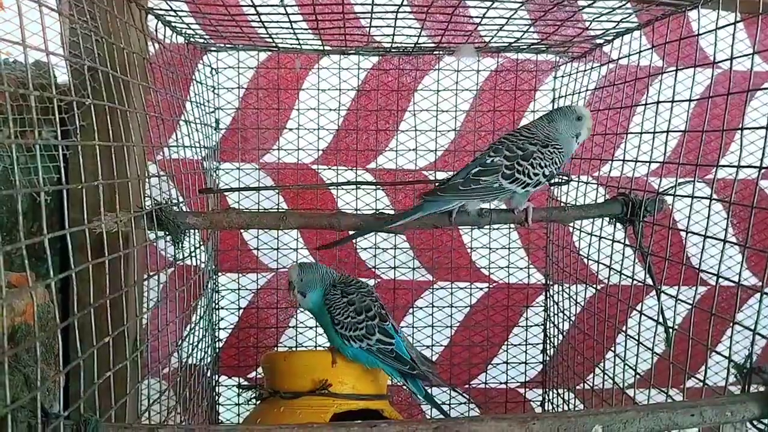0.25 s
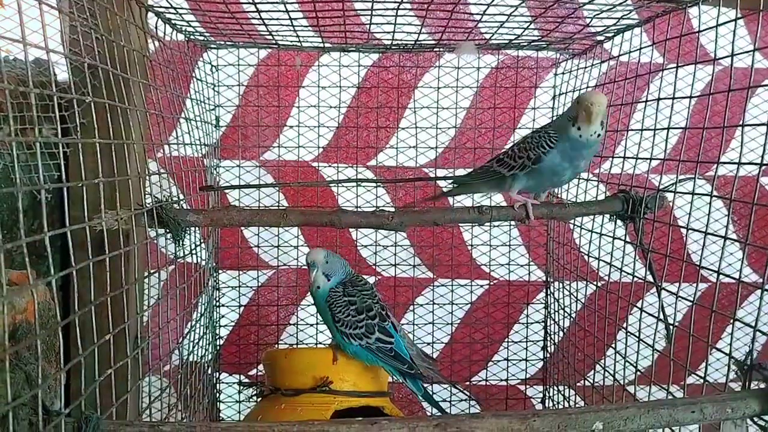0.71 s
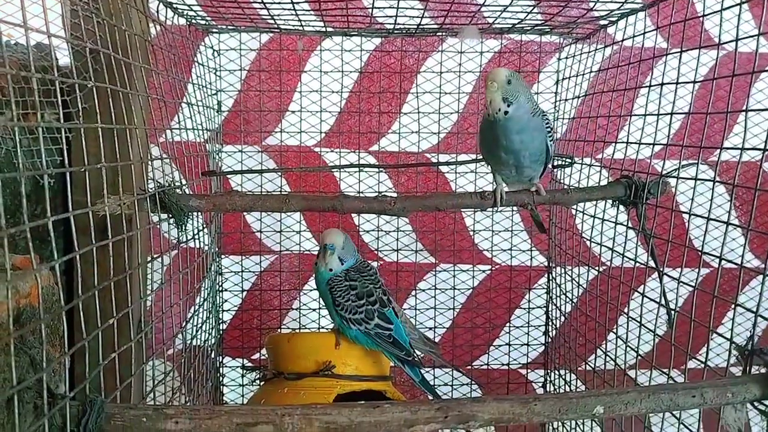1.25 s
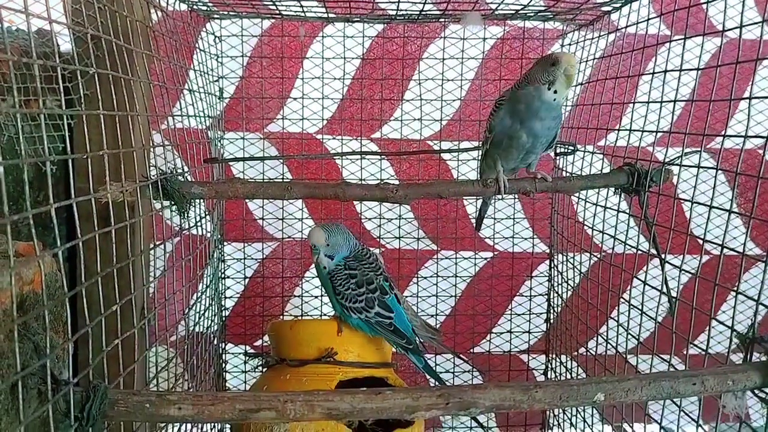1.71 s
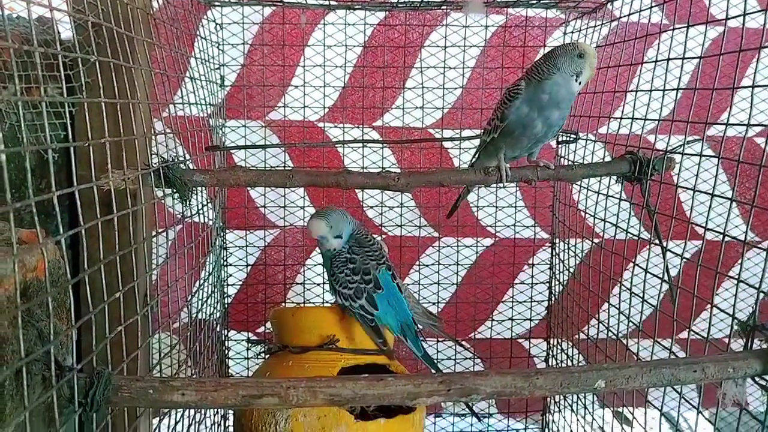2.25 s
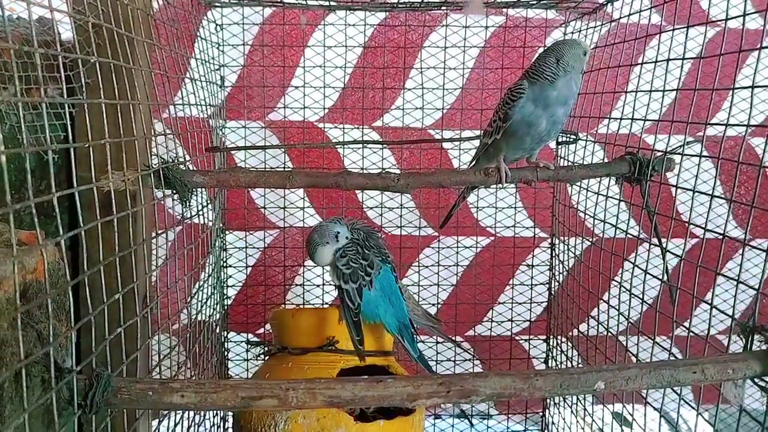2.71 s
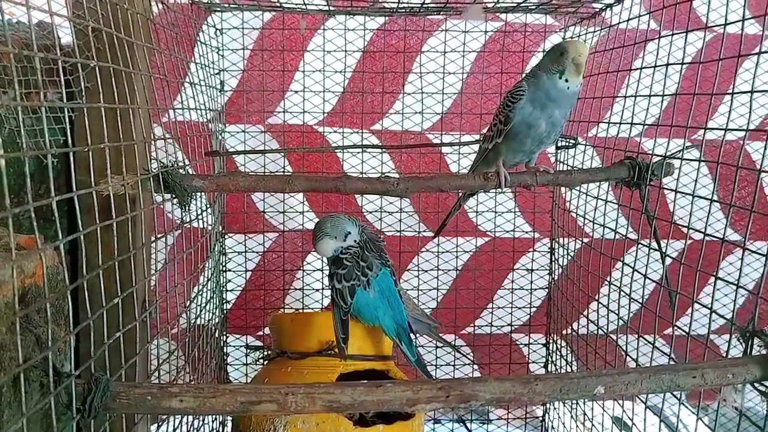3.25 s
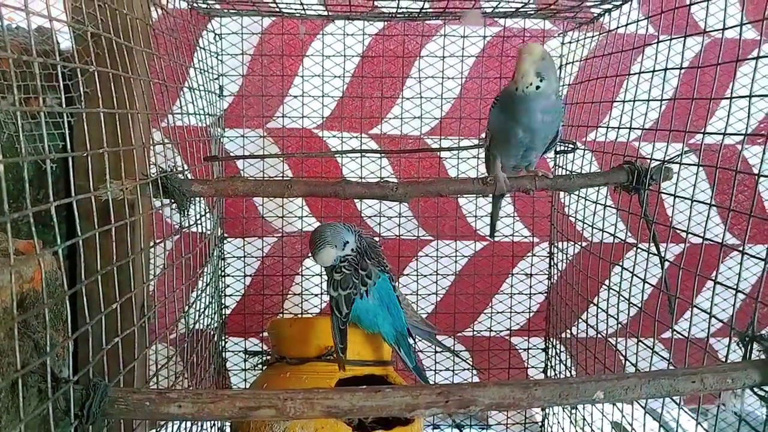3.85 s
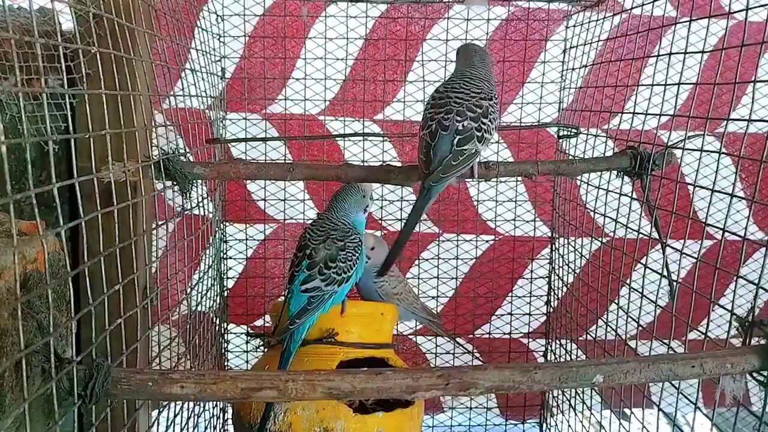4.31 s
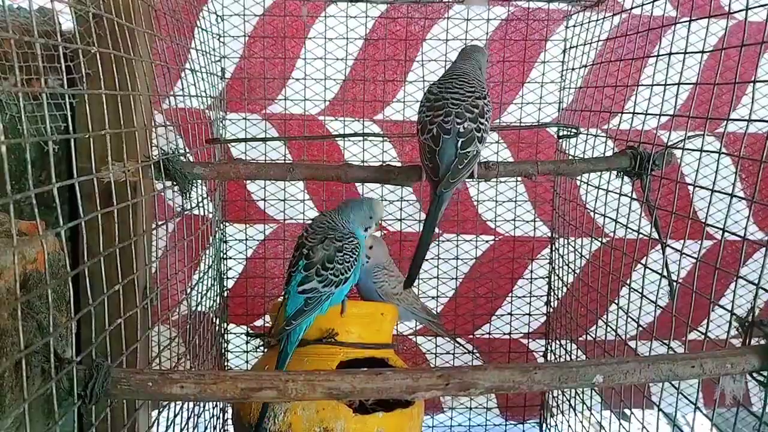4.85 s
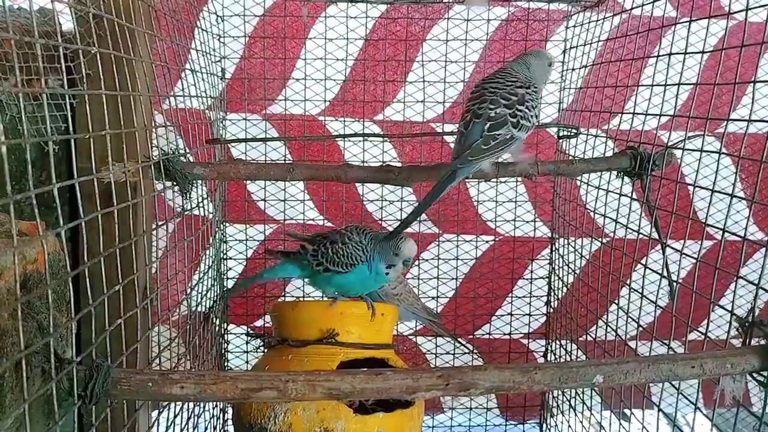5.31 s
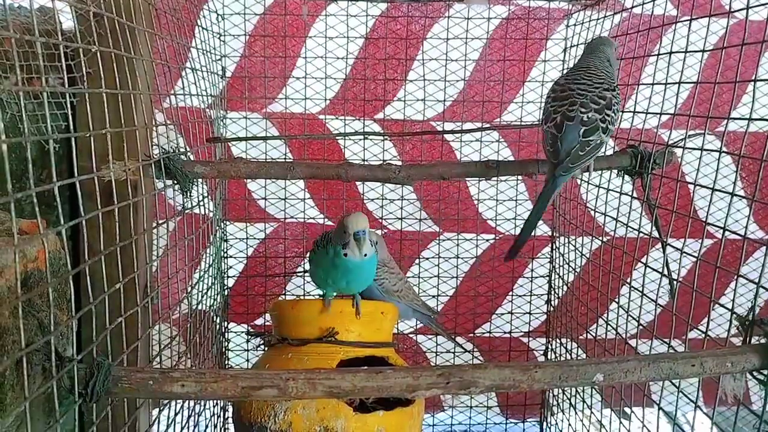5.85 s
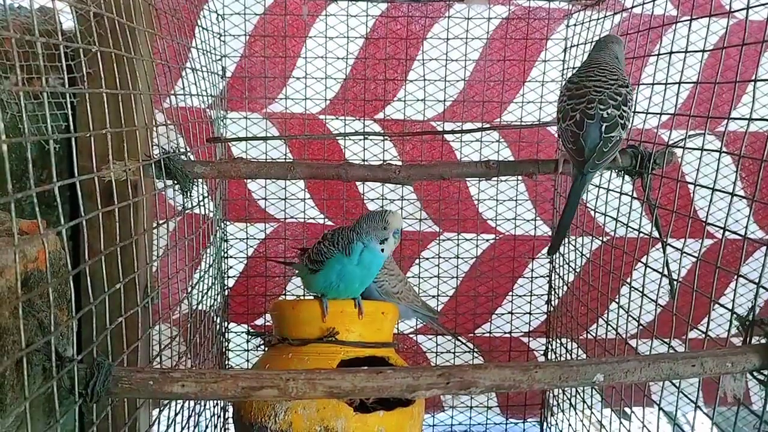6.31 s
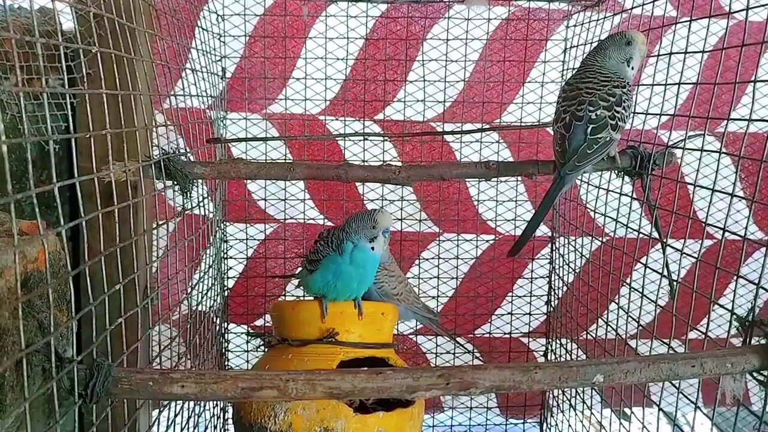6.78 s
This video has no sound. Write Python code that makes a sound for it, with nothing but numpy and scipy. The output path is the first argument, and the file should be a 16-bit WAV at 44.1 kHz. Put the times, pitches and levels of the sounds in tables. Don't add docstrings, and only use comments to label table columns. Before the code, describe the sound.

Budgies give sharp, sliding chirps and reedy chatter in an echoing cage, with soft throaty warbles, faint claw scrapes and a quiet outdoor hum behind.

```python
import sys
import numpy as np
from scipy import signal
from scipy.fft import rfft, irfft, next_fast_len
from scipy.io import wavfile
from scipy.ndimage import map_coordinates

SR = 44100
rng = np.random.default_rng(int(sys.argv[2]) if len(sys.argv) > 2 else 0)


def decibels_to_gain(level_db):
    exponent = np.asarray(level_db, float) / 20
    return 10 ** exponent


def inscribe(sig):
    pcm = np.round(np.clip(np.atleast_2d(sig).T, -1, 1) * 32767)
    wavfile.write(sys.argv[1], SR, pcm.astype(np.int16))


N = 311346

# pitch_hz, density_db [per Hz]
TRAFFIC_SPECTRUM = [(12, -32), (20, -18.5), (49, -0.5), (80, -2), (245, -6.5), (304, -12.5), (500, -21),
                    (650, -32.5), (1100, -120)]
# pitch_hz, density_db [per Hz]
AIR_SPECTRUM = [(240, -15), (400, -7.5), (715, -3), (1170, -6.5), (1510, -7.5), (2970, -2.5), (3510, -2),
                (4290, -12), (8400, -15), (10100, -26.5), (11200, -22.5), (13300, -61), (15400, -49),
                (15900, -130)]
# start_s, level_db
MOTOR_LEVEL = [
    (3.4, -81),
    (3.6, -58.5),
    (7.1, -60),
]
# pitch_hz, gain_db
MICROPHONE = [(9000, -1.5), (9600, -3.5), (10200, -30), (10750, -6), (11500, -0.5), (12500, -22.5),
              (13500, -41), (14600, -22), (15400, -27), (15900, -70)]
# pitch_hz, t60_s
SHELTER_DECAY = [(1000, 0.52), (3000, 0.55), (6000, 0.48), (12000, 0.3)]

SOFT_PARTIALS = [0, -11.5, -18, -19, -21.5]
PRESSED_PARTIALS = [-11, -1.5, -11, -9.5, -22.5]
THROATY_PARTIALS = [6.5, -14.5, -28.5, -19.5]

# start_s, overtones_db
FACING_MICROPHONE = [(.03, -25.5), (.12, -25), (1.25, -15), (1.33, -31), (1.63, -19.5), (1.9, -14),
                     (2.36, -19), (2.5, -30), (2.7, -22.5), (3.1, -25.5), (3.6, -28), (3.9, -18),
                     (4.75, -23), (4.89, -31.5), (5.0, -26), (5.2, -32), (6.85, -25.5), (7.0, -26.5)]
# start_s, from_hz, to_hz, level_db
FAST_GLIDES = [(.031, 2596, 3170, -21.5), (.045, 3210, 3600, -21), (.056, 3320, 2750, -35),
               (.076, 3490, 2760, -31), (.064, 2333, 1780, -32.5), (.095, 1870, 2380, -33.5),
               (.122, 2793, 2310, -25.5), (1.29, 3580, 3050, -29), (1.316, 4350, 3500, -27),
               (2.52, 2410, 2880, -35.5), (2.545, 1930, 1313, -39.5), (2.867, 1596, 2240, -42),
               (3.051, 4130, 3670, -42.5), (3.103, 3680, 4300, -37), (3.159, 1735, 2120, -39.5),
               (3.634, 2820, 3130, -35), (3.686, 1618, 1850, -31), (4.859, 2166, 1690, -37.5),
               (5.13, 4090, 3480, -41), (5.174, 3000, 2590, -26), (5.546, 1177, 935, -49),
               (6.986, 1980, 1770, -32), (6.99, 1310, 1770, -42.5)]
MIDDLING_GLIDES = [(.084, 4400, 4930, -34), (.132, 5340, 4860, -42), (1.87, 1660, 2280, -48),
                   (1.874, 1723, 1520, -37.5), (2.66, 4100, 3940, -31), (3.572, 2573, 3250, -25.5),
                   (3.933, 3950, 3430, -31.5), (4.743, 3620, 4020, -45.5), (4.875, 3170, 2570, -31),
                   (4.895, 2994, 2600, -26.5), (5.007, 2006, 2510, -32), (6.875, 4260, 3470, -34.5)]
SLOW_GLIDES = [(1.255, 3380, 4120, -39), (1.263, 2260, 2600, -31.5), (1.295, 3047, 2660, -28),
               (1.69, 2670, 2375, -33), (1.866, 3430, 2900, -36.5), (2.157, 3030, 2900, -36),
               (2.36, 1658, 2210, -43.5), (2.392, 2910, 2480, -39.5), (2.432, 2700, 2900, -45),
               (2.44, 2837, 3420, -36), (2.712, 2700, 2900, -26.5), (2.682, 2128, 2420, -30.5),
               (3.071, 2813, 3730, -38), (3.139, 2680, 2260, -36), (4.915, 3134, 2280, -30.5),
               (5.17, 3260, 3400, -36.5), (5.185, 2978, 2700, -22), (5.198, 3270, 2860, -29.5),
               (6.815, 2910, 2500, -37.5)]
# start_s, length_s, pitch_hz, level_db
HELD_NOTES = [(0, 0.034, 1647, -50), (0, 0.0087, 3230, -39), (1.269, 0.017, 2670, -37),
              (1.594, 0.017, 3470, -36.5), (1.622, 0.0072, 1650, -35), (1.951, 0.035, 3560, -39),
              (2.405, 0.019, 2165, -36), (2.466, 0.036, 3410, -46), (3.035, 0.018, 2120, -55),
              (3.04, 0.0087, 2003, -36), (3.474, 0.036, 1783, -37.5), (3.529, 0.0067, 2700, -26.5),
              (4.794, 0.026, 1324, -44.5), (5.017, 0.022, 1407, -48.5), (5.129, 0.077, 3724, -47),
              (5.193, 0.0065, 2420, -34), (5.28, 0.014, 2476, -24.5), (7.038, .058, 2550, -45)]
# start_s, length_s, pitch_hz, level_db
BEAK_PARTIALS = [
    (2.7, .06, 15000, -62),
    (2.76, .1, 12900, -52),
    (2.82, .06, 15000, -56),
    (3.6, .07, 15000, -58),
    (3.6, .07, 12900, -52),
    (4.955, .07, 15100, -52),
    (4.96, 0.051, 12600, -60),
    (5.22, .05, 15000, -65),
    (6.944, .07, 15100, -58),
]
# start_s, length_s, pitch_hz, level_db, overtones_db
LOUD_NOTES = [(.049, 0.068, 3540, -24.5, -18), (1.34, 0.0076, 3106, -17, -14),
              (1.369, 0.024, 2707, -27, 6.5), (1.932, 0.013, 3493, -22, -25),
              (1.965, 0.051, 2900, -21, -11), (2.761, .105, 3203, -24, -30), (3.6, 0.042, 3253, -25.5, -22),
              (3.909, 0.0082, 2697, -27.5, -5.5), (4.89, 0.023, 2873, -20, -43),
              (4.93, 0.0073, 3143, -19.5, -30), (4.957, 0.036, 2510, -26, -23.5),
              (5.214, .016, 2840, -19, -29)]
# start_s, length_s, from_hz, to_hz, level_db
REEDY_GLIDES = [(0.114, 0.027, 2940, 2495, -23), (1.619, 0.017, 2214, 1680, -38.5),
                (1.91, 0.015, 2140, 2830, -31), (1.936, 0.013, 2740, 2900, -24),
                (2.414, 0.028, 3190, 2870, -40), (2.695, 0.023, 3353, 2644, -22),
                (2.732, 0.03, 2570, 3216, -18), (2.8, 0.049, 2900, 2438, -27.5),
                (3.117, 0.02, 2740, 2480, -36.5), (3.504, 0.072, 2265, 2003, -40),
                (3.636, .025, 2878, 2586, -18), (3.942, 0.016, 2165, 1650, -41),
                (6.829, 0.017, 2343, 2056, -28.5), (6.854, 0.018, 3077, 2458, -19.5),
                (6.889, 0.021, 2378, 3100, -22), (7.002, 0.052, 2410, 2900, -33.5)]
# start_s, length_s, pitch_hz, level_db, overtones_db
REEDY_NOTES = [(1.248, 0.033, 3150, -35, -11), (1.307, 0.013, 2075, -31.5, -26),
               (1.646, 0.021, 2690, -30, -9), (1.658, 0.019, 2880, -27.5, -9.5),
               (1.672, 0.046, 2743, -21.5, -16), (1.898, 0.0057, 2685, -24.5, -18),
               (2.144, 0.03, 2080, -49.5, -3), (2.867, 0.015, 1470, -39, -14),
               (3.557, 0.019, 2280, -35.5, -21), (3.826, 0.029, 1982, -38, -15.5),
               (3.976, 0.015, 2350, -38, -10), (5.022, 0.012, 1170, -41, -7),
               (5.133, 0.023, 1973, -39, -22), (5.161, 0.017, 1870, -34.5, -24),
               (6.908, 0.033, 3078, -21, -27.5), (6.959, 0.028, 2493, -30.5, -19),
               (6.455, 0.026, 1590, -41, 1.5)]
# start_s, pitch_hz, level_db, overtones_db
REEDY_CLIMB = [
    (1.945, 2782, -26, -6.5),
    (1.965, 2840, -24.5, -5),
    (1.99, 2964, -24.5, -3),
    (2.012, 2936, -27, -7),
]

# start_s, length_s, level_db, centre_hz
RASPED_CALLS = [(1.14, 0.082, -51, 2540), (2.82, .07, -64, 9200), (0.021, 0.023, -49, 3600),
                (5.19, 0.014, -56.5, 4700), (0.068, 0.054, -33.5, 2890), (0.55, 0.19, -63.5, 5070),
                (1.1, 0.024, -65, 8200), (.908, 0.011, -65, 5500), (0.76, 0.036, -58, 2400),
                (1.16, 0.033, -65.5, 7900), (1, 0.013, -54.5, 3030), (.925, .012, -45, 6900),
                (2.659, 0.09, -39, 3120), (4.269, 0.035, -52.5, 3300), (4.326, 0.64, -55, 2260),
                (4.353, 0.36, -59.5, 3300), (5.594, 0.23, -67, 8040), (6.463, 0.34, -51.5, 2170),
                (6.81, 0.018, -41, 3130)]
# start_s, length_s, level_db, centre_hz
FEATHER_RUSTLES = [(0, 0.021, -59, 4900), (.059, 0.049, -54, 6050), (1.093, .11, -56, 1990),
                   (1.244, 0.018, -57.5, 7750), (1.285, 0.14, -46, 7100), (2.14, 0.18, -61, 5200),
                   (2.32, 0.078, -58.5, 4030), (3.2, 0.24, -69.5, 10500), (3.92, 0.054, -49.5, 4600),
                   (4.232, .15, -59.5, 5350), (4.645, 0.17, -57.5, 5300), (5.68, 0.029, -68.5, 3980),
                   (6.206, 0.45, -64.5, 7100), (6.805, 0.14, -56, 5760)]
# start_s, length_s, level_db, centre_hz
CLAW_SCRAPES = [(.778, 0.018, -60, 4950), (.793, 0.026, -53.5, 2780), (.888, 0.021, -52, 4450),
                (.904, 0.031, -39.5, 4150), (2.656, 0.027, -57, 3130), (4.19, 0.017, -62.5, 9150),
                (5.86, 0.083, -59, 2250), (6.05, 0.055, -56, 3350), (6.093, 0.16, -54, 1980),
                (6.384, 0.022, -52.5, 1570), (6.743, 0.052, -54, 2030)]

# start_s, length_s, from_hz, to_hz, level_db
CLOSE_GLIDES = [(0.017, 0.0081, 2750, 4340, -36.5), (1.24, 0.013, 4440, 3520, -31.5),
                (1.242, 0.021, 2240, 1690, -34), (1.286, 0.018, 3804, 3037, -21.5),
                (2.338, .024, 1950, 1610, -33.5), (2.656, .009, 1490, 4280, -31),
                (3.849, 0.013, 4440, 3370, -43.5), (3.901, 0.0073, 4500, 3900, -35.5),
                (4.863, 0.01, 4250, 3500, -36), (5.18, .016, 3254, 2750, -24),
                (5.284, 0.011, 4040, 3470, -33), (6.813, 0.0138, 4165, 3323, -30.5)]
# start_s, pitch_hz, level_db, overtones_db
CLOSE_BENDS = [
    [(3.862, 2744, -47, -6), (3.872, 3150, -39, -1), (3.88, 3450, -39, 3), (3.9, 3310, -33, 1)],
    [(5.264, 2555, -28, -14), (5.275, 2440, -31.5, -8.5), (5.29, 2370, -31, -9)],
]

# start_s, from_hz, to_hz, level_db
NEAR_MURMURS = [(4.28, 1080, 1257, -47), (4.328, 1240, 1174, -50), (4.37, 992, 1034, -45.5),
                (4.409, 1175, 1210, -46), (4.44, 1004, 1093, -48), (4.481, 1280, 1317, -41),
                (4.524, 1133, 1070, -41.5), (4.565, 1081, 1049, -47), (4.601, 1198, 1350, -47.5),
                (4.661, 1185, 1153, -44.5), (6.113, 1014, 1040, -59), (6.166, 1122, 1155, -53.5),
                (6.238, 1114, 1070, -64)]
# start_s, pitch_hz, level_db, overtones_db
NEAR_WARBLES = [
    [(4.728, 1396, -44.5, 6.5), (4.765, 1362, -46, 4.5), (4.782, 1547, -44, 3.5), (4.79, 1670, -38, -14),
     (4.8, 2420, -39, -27)],
    [(6.22, 1330, -58, 5), (6.255, 1452, -49, -7), (6.29, 1425, -48, 2), (6.318, 1528, -47.5, 2),
     (6.33, 1682, -37, -1.5), (6.352, 1894, -32, -20), (6.4, 2000, -32.5, -14), (6.445, 2000, -38, -19)],
    [(6.453, 1653, -39.5, -2), (6.49, 1470, -38, 1), (6.57, 1441, -41.5, -5), (6.65, 1279, -44, 3),
     (6.728, 1421, -35, -4), (6.748, 2100, -14.5, -24)],
]
# start_s, from_hz, to_hz, level_db
NEAR_SQUEEZES = [
    (6.497, 1466, 1207, -45),
    (6.5, 1426, 1470, -44.5),
    (6.58, 1474, 1298, -43),
    (6.68, 1405, 1346, -46.5),
]

# start_s, pitch_hz, level_db, t60_s
FEEDER_KNOCK = (7.031, 590, -34, .035)


def unit(x):
    return x / np.sqrt(np.mean(x ** 2) + 1e-20)


def along(points, hz):
    f, v = np.transpose(points)
    return np.interp(np.log(hz + 1), np.log(f + 1), v)


def filtered(x, response):
    m = next_fast_len(len(x) + 8192)
    return irfft(rfft(x, m) * response(np.fft.rfftfreq(m, 1 / SR)), m)[:len(x)]


def wobble(rate, size=N):
    knots = rng.standard_normal(int(N * rate / SR) + 4)
    return map_coordinates(knots, [np.arange(size) * rate / SR])


def traffic_and_air():
    rumble = unit(filtered(rng.standard_normal(N), lambda f: decibels_to_gain(along(TRAFFIC_SPECTRUM, f))))
    air = unit(filtered(rng.standard_normal(N), lambda f: decibels_to_gain(along(AIR_SPECTRUM, f) - along(MICROPHONE, f))))
    return decibels_to_gain(-53.5 + 0.16 * wobble(1.8)) * rumble + decibels_to_gain(-57.5 + 0.32 * wobble(4.1)) * air


def motors():
    t = np.arange(N) / SR
    hum_db = np.interp(t, *np.transpose(MOTOR_LEVEL)) + 0.39 * wobble(12)
    hum = decibels_to_gain(hum_db) * np.sin(2 * np.pi * 259 * t + 1.25 * wobble(3.1))
    low = decibels_to_gain(-58 + 5.1 * wobble(5.06)) * np.sin(2 * np.pi * 68 * t + 1.5 * wobble(19))
    upper = decibels_to_gain(-60 + 3.5 * wobble(4)) * np.sin(2 * np.pi * 97 * t + 1.1 * wobble(3.6))
    return hum + low + upper


def syrinx(tracks, partials_db, edge, waver, rough, lag=0):
    out = np.zeros(N + SR)
    shake = wobble(160, size=N + SR)
    flutter = 1 + rough * wobble(700, size=N + SR)
    for track in tracks:
        s, *controls = np.transpose(track)
        length = s[-1] - s[0]
        i = round((s[0] + lag) * SR)
        u = np.linspace(0, 1, round(length * SR))
        hz, db, over_db = [np.interp(s[0] + u * length, s, c) for c in controls]
        phase = 2 * np.pi * np.cumsum(hz * (1 + waver * shake[i:i + len(u)])) / SR
        voice = np.sin(phase)
        for k, partial_db in enumerate(partials_db, 2):
            if k * hz.max() < SR / 2.5:
                voice = voice + decibels_to_gain(over_db + partial_db) * np.sin(k * phase)
        attack = np.clip(u * length / 0.0028, 0, 1)
        out[i:i + len(u)] += decibels_to_gain(db) * attack * (1 - u ** 2) ** edge * voice
    return (out * flutter)[:N]


def note(s, length, hz0, hz1, db, over_db):
    return [(s, hz0, db, over_db), (s + length, hz1, db, over_db)]


def held(s, length, hz, db, over_db):
    return note(s, length, hz, hz, db, over_db)


def overtones_db(s, hz):
    off_tract_db = 17.5
    return np.interp(s, *np.transpose(FACING_MICROPHONE)) + off_tract_db * np.abs(np.log2(hz / 2900))


def soft_calls(lag):
    tracks = []
    for rows, speed in [(FAST_GLIDES, 23), (MIDDLING_GLIDES, 12), (SLOW_GLIDES, 5.5)]:
        for s, a, b, db in rows:
            length = np.abs(np.log2(b / a)) / speed
            tracks.append(note(s, length, a, b, db, overtones_db(s, np.sqrt(a * b))))
    for rows in [HELD_NOTES, BEAK_PARTIALS]:
        for s, length, hz, db in rows:
            tracks.append(held(s, length, hz, db, overtones_db(s, hz)))
    return syrinx(tracks, SOFT_PARTIALS, edge=0.23, waver=0.012, rough=0.45, lag=lag)


def click_hiss():
    beat = np.cumsum(210 * decibels_to_gain(2 * wobble(60))) / SR
    clicks = 0.5 + 1.4 * np.exp(-7 * (beat % 1))
    return rng.standard_normal(N) * clicks * decibels_to_gain(1.4 * wobble(25))


def noise_bursts(rows, source, octaves, swell):
    out = np.zeros(N + SR)
    for s, length, db, hz in rows:
        i = round(s * SR)
        u = np.linspace(0, 1, round(length * SR))
        burst = source[i:i + len(u)] * np.abs(np.sin(np.pi * u)) ** swell
        burst = np.pad(burst, (0, 2048))
        burst = filtered(burst, lambda f: np.exp(-.5 * (np.log2((f + 1) / hz) / octaves) ** 2))
        out[i:i + len(burst)] += decibels_to_gain(db) * unit(burst) * np.sqrt(len(burst) / len(u))
    return out[:N]


def rustles(source):
    return noise_bursts(FEATHER_RUSTLES, source, octaves=0.5, swell=.6)


def rasps(source):
    return noise_bursts(RASPED_CALLS, source, octaves=0.25, swell=.15)


def close_bird():
    glides = [note(*row, -26.5) for row in CLOSE_GLIDES]
    return syrinx(glides + CLOSE_BENDS, SOFT_PARTIALS, edge=.3, waver=.008, rough=.2)


def loud_notes(lag):
    tracks = [held(*row) for row in LOUD_NOTES]
    return syrinx(tracks, SOFT_PARTIALS, edge=.27, waver=.009, rough=.24, lag=lag)


def pressed_calls(lag):
    tracks = [REEDY_CLIMB] + [held(*row) for row in REEDY_NOTES]
    for s, length, a, b, db in REEDY_GLIDES:
        tracks.append(note(s, length, a, b, db, overtones_db(s, np.sqrt(a * b)) - 4))
    return syrinx(tracks, PRESSED_PARTIALS, edge=0.33, waver=0.013, rough=0.42, lag=lag)


def scrapes(source):
    return noise_bursts(CLAW_SCRAPES, source, octaves=0.93, swell=.25)


def near_bird():
    murmurs = [note(s, 0.0494, a, b, db, -5) for s, a, b, db in NEAR_MURMURS]
    squeezes = [note(s, 0.034, a, b, db, 10.5) for s, a, b, db in NEAR_SQUEEZES]
    return syrinx(murmurs + NEAR_WARBLES + squeezes, THROATY_PARTIALS, edge=.5, waver=.015, rough=.34)


def knock():
    s, hz, db, t60 = FEEDER_KNOCK
    t = np.clip(np.arange(N) / SR - s, 0, None)
    return decibels_to_gain(db - 60 * t / t60) * (1 - np.exp(-t / 0.0018)) * np.sin(2 * np.pi * hz * t)


def shelter(x, count=24):
    out = np.zeros(N + 2 * SR)
    step = N // count + 1
    for k in range(-1, count):
        start = max(k * step, 0)
        part = x[start:(k + 2) * step]
        fade = 1 - np.abs((np.arange(len(part)) + start) / step - k - 1)
        hz, t, z = signal.stft(rng.standard_normal(SR), SR, nperseg=256)
        decay = decibels_to_gain(-60 * t / along(SHELTER_DECAY, hz)[:, None])
        tail = signal.istft(z * decay, SR, nperseg=256)[1]
        tail = tail * (1 - np.exp(-np.arange(len(tail)) / SR / 0.0042))
        tail = filtered(tail, lambda f: np.sqrt(.55 / along(SHELTER_DECAY, f)))
        wet = signal.fftconvolve(part * np.sqrt(np.abs(fade)), tail / np.linalg.norm(tail))
        out[start:][:len(wet)] += wet
    return out[:N]


def scene():
    lag = .003
    rough = click_hiss()
    far = soft_calls(lag) + loud_notes(lag) + pressed_calls(lag)
    far = far + rustles(rough) + rasps(rough) + scrapes(rough)
    close = close_bird()
    near = near_bird()
    echo = shelter(far + decibels_to_gain(-4) * near + decibels_to_gain(-3) * close)
    birds = decibels_to_gain(-2.5) * far + decibels_to_gain(-2) * near + close + echo
    return (birds + knock() + traffic_and_air() + motors())[None]


def roll_off(x):
    return signal.sosfilt(signal.butter(12, 16630, fs=SR, output="sos"), x)


def record(dry):
    mix = filtered(dry[0], lambda f: decibels_to_gain(along(MICROPHONE, f)))[None]
    return roll_off(mix)


dry = scene()
out = record(dry)
inscribe(out)
```